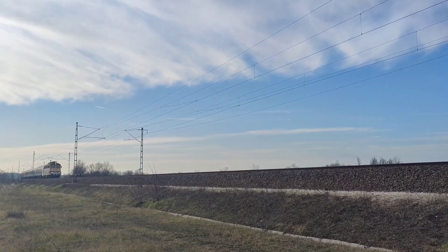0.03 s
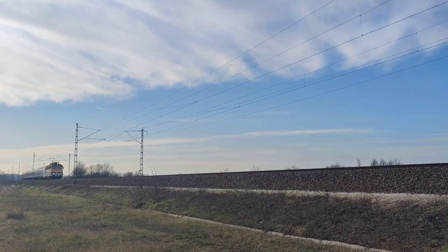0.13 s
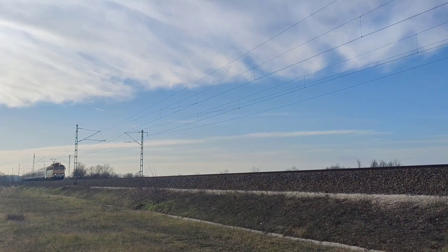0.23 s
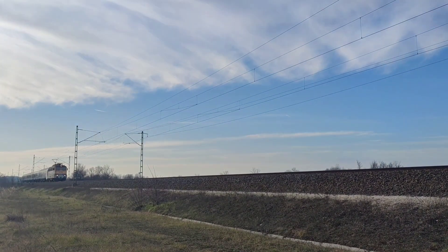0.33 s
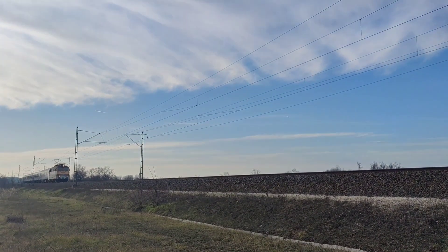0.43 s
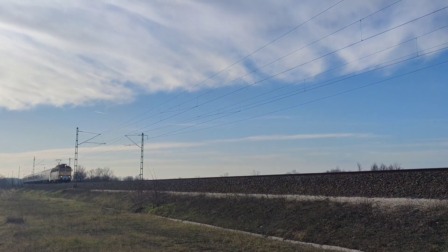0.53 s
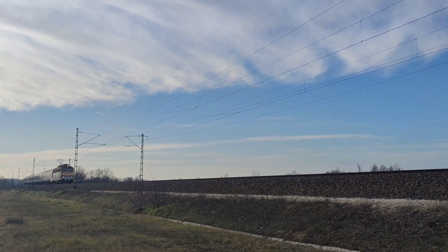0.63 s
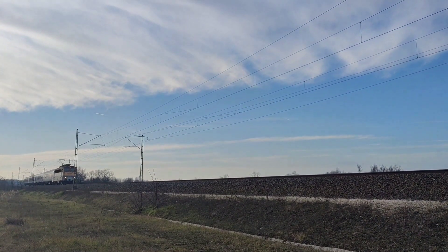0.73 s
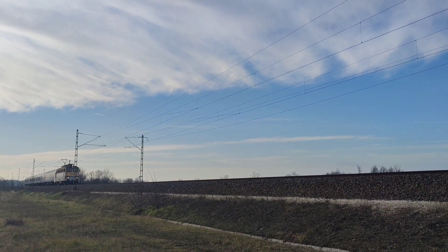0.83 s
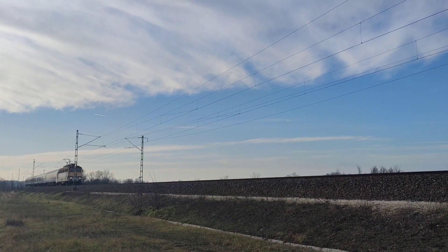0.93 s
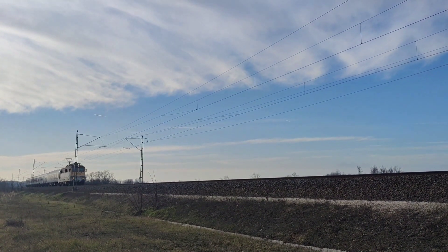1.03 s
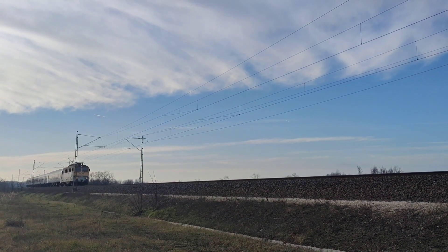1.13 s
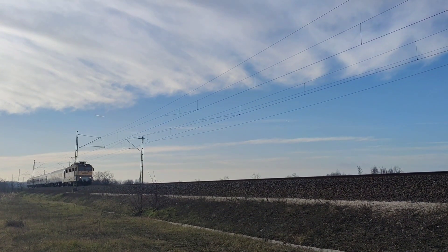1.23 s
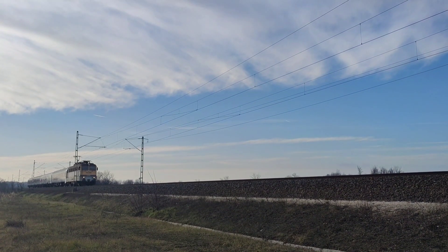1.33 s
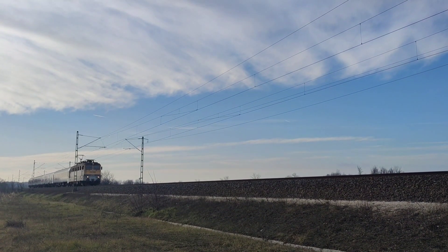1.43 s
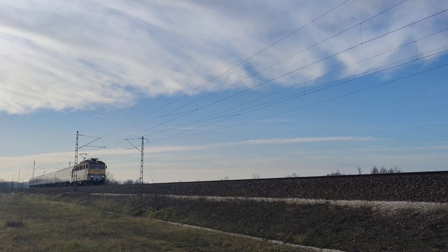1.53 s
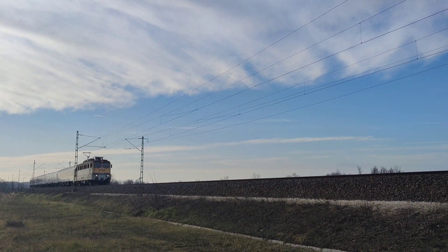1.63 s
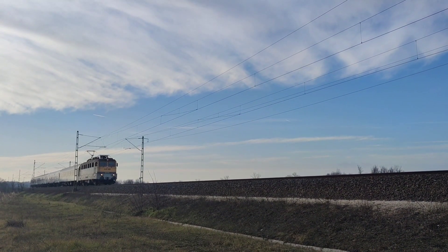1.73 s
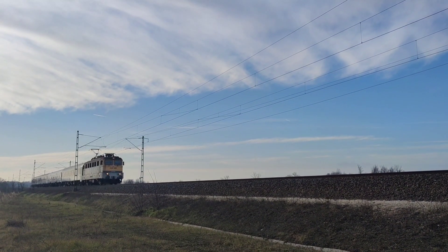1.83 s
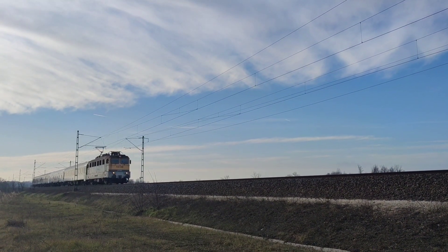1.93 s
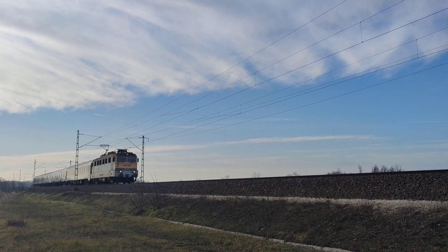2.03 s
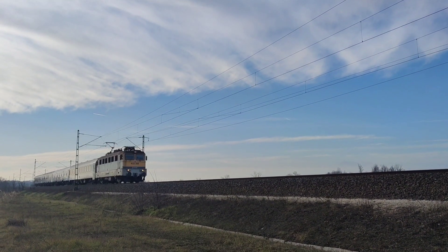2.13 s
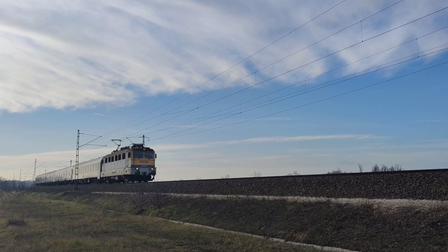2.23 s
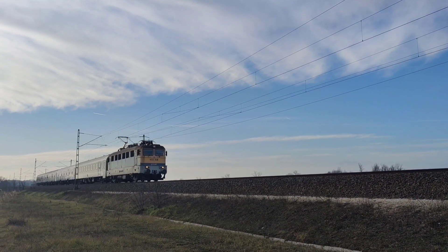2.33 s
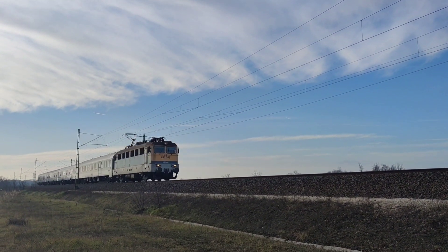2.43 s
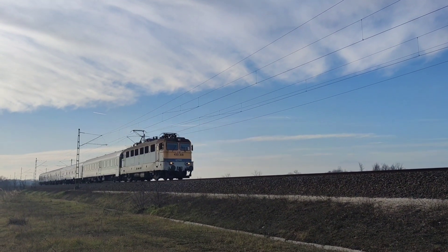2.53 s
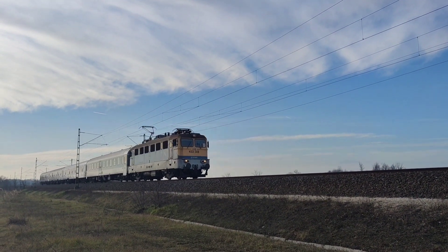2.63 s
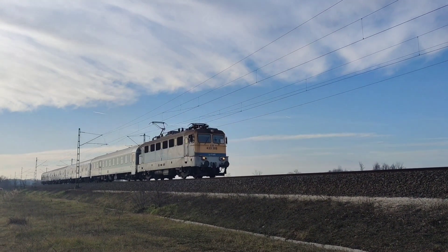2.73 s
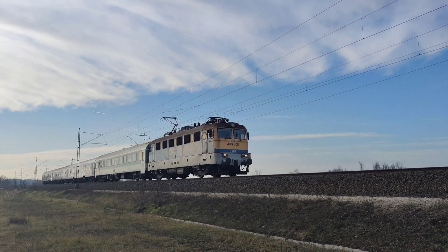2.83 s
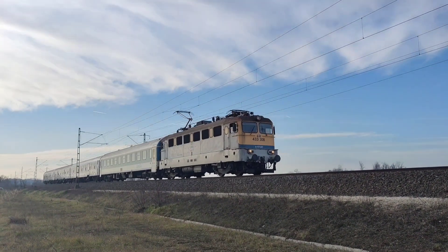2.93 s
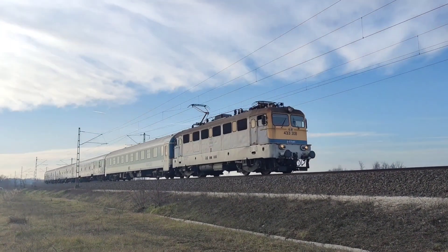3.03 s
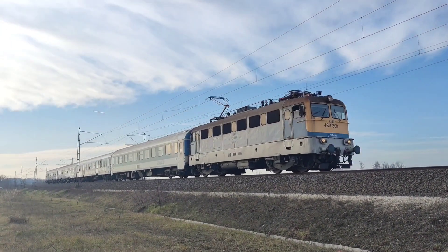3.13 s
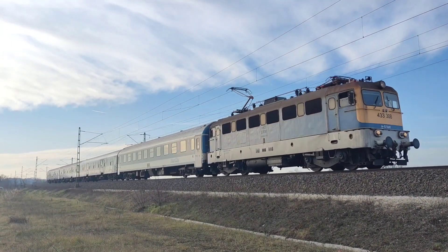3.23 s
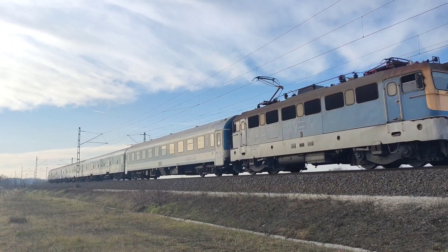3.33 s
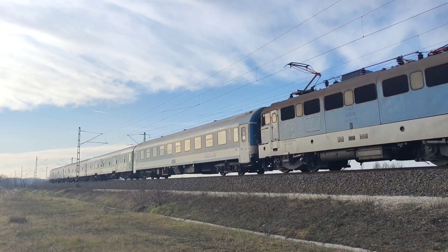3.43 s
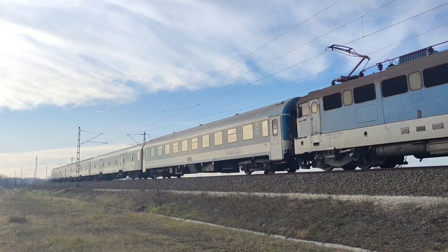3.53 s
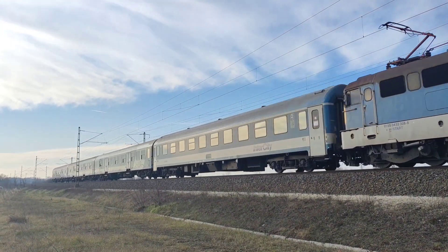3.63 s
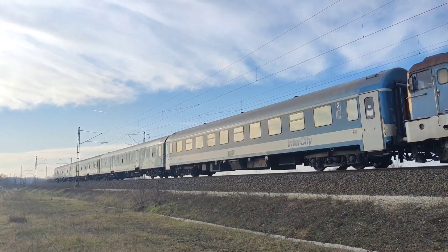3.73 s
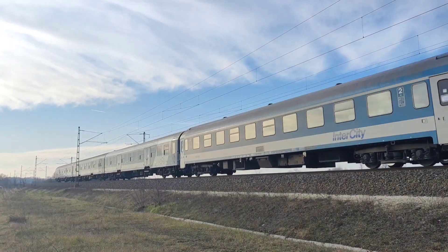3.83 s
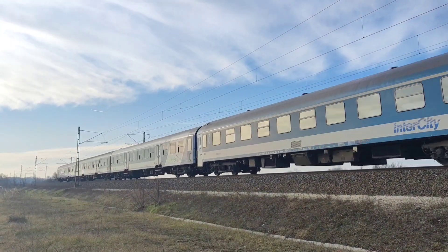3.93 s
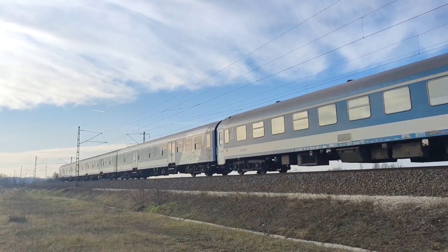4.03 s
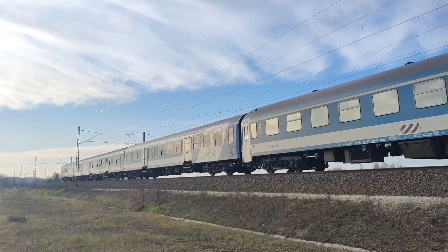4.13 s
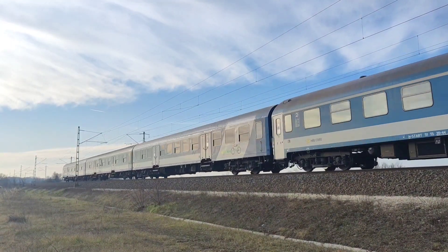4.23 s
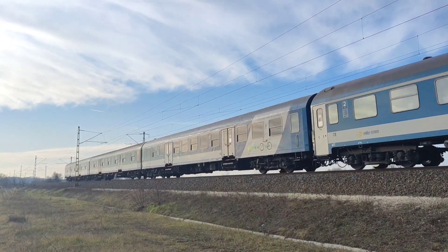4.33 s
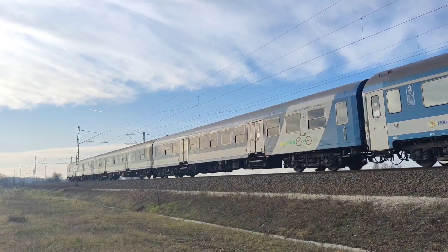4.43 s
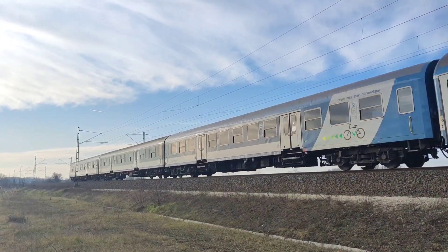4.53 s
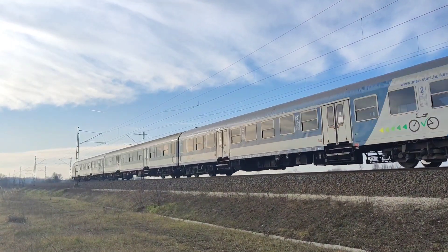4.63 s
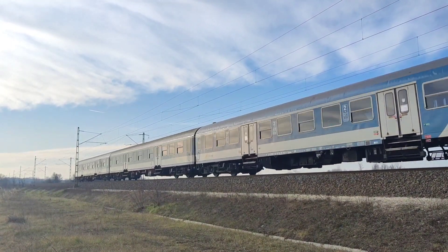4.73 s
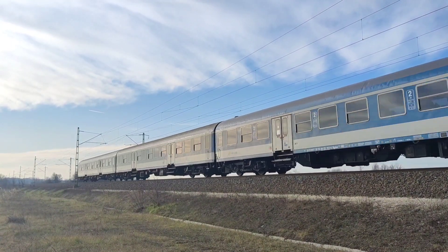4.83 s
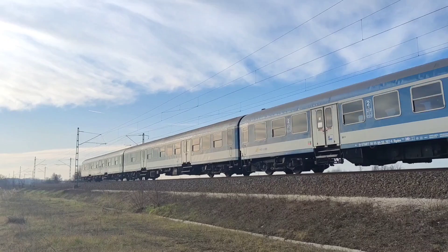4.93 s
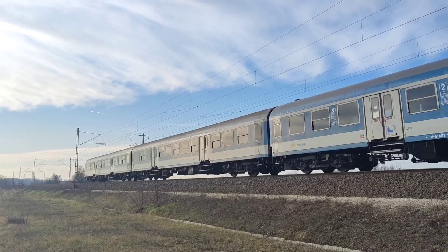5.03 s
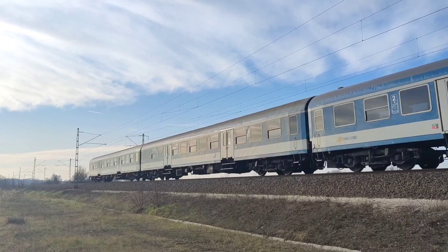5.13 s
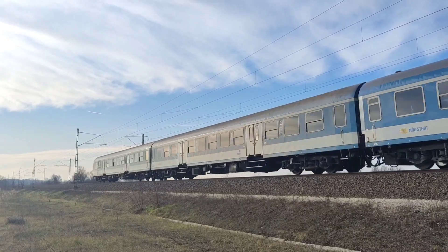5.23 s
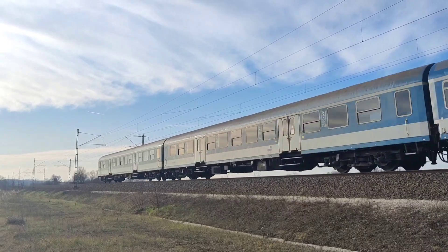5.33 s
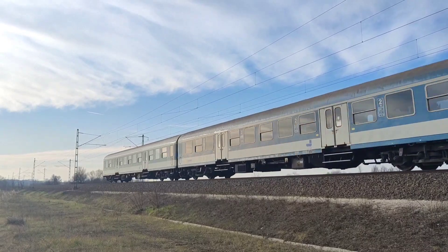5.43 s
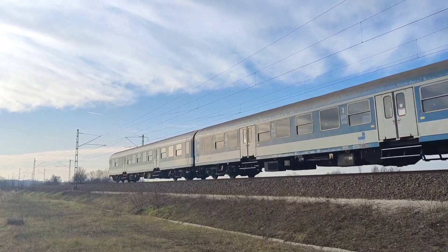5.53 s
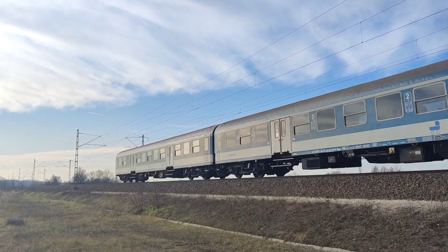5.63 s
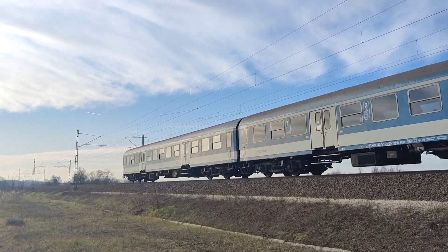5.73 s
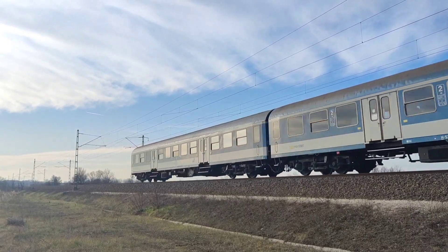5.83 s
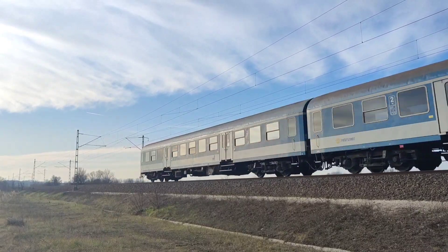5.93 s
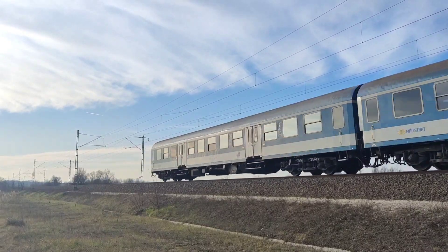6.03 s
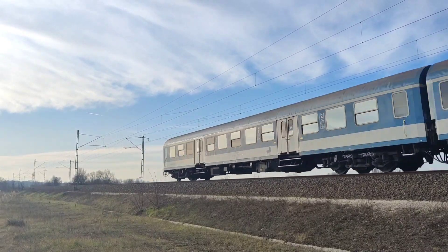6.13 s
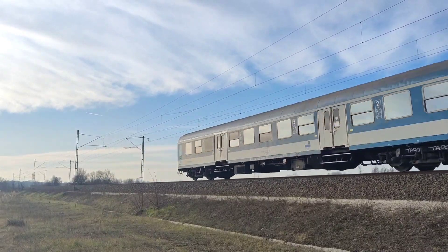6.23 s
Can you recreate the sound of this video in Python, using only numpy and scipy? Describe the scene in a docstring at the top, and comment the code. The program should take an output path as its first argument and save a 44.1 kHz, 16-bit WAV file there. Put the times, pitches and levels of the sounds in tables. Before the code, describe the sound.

An electric passenger train rumbles in from afar, rails singing, then rushes past close by with ringing wheels and brief chattering clacks.

```python
"""An electric passenger train runs in from the distance and rushes past beside an open field.
First a far rumble of rough wheels on rail and one soft knock nearby; from 1.5 s the rails sing ahead.
At 3.3-4.1 s the locomotive passes with its rumble and the note of its blowers. Coach bogies follow,
their wheel resonances sinking by Doppler shift. From 5.4 s one coach's rough treads strike the rail
and chatter."""
import sys
import numpy as np
from scipy import signal
from scipy.fft import rfft, irfft
from scipy.io import wavfile
from scipy.ndimage import uniform_filter1d

SR = 44100
rng = np.random.default_rng(int(sys.argv[2]) if len(sys.argv) > 2 else 0)


def inscribe(sig):
    """Save sig as 16-bit PCM at rate SR to the path in sys.argv[1].

    A 1-D sig is mono; a 2-D sig holds one channel per row.
    Samples are clipped to [-1, 1] before scaling.
    """
    pcm = np.round(np.clip(np.atleast_2d(sig).T, -1, 1) * 32767)
    wavfile.write(sys.argv[1], SR, pcm.astype(np.int16))


N = 276504
T = np.arange(N) / SR
FRAME = 2048
HOP = FRAME // 4
BIN_HZ = np.fft.rfftfreq(FRAME, 1 / SR)
FRAME_S = np.arange(N // HOP + 3)[:, None] * HOP / SR
TRAIN_M_PER_S, SOUND_M_PER_S, TRACK_DISTANCE_M = 32., 343., 14.

# Bogies or bogie pairs, locomotive first, with five bands of rolling noise:
# t abreast/s, body rumble/dB, sleeper roar/dB, wheel ring/dB, contact hiss/dB, fizz/dB
BOGIE_BANDS = [(3.29, -34, -29.2, -32.2, -39.6, -63.8), (3.7, -23.2, -26.9, -25.6, -30, -54.2),
               (4.12, -25.9, -28.8, -24.3, -31.1, -49.9), (4.83, -39.6, -42.4, -26.6, -33.7, -50.3),
               (5.56, -36.2, -26.3, -21.5, -27.3, -49.9), (5.87, -42.6, -34.7, -18.6, -32, -55.5),
               (6.29, -36.1, -25.4, -19.5, -26.2, -49.3)]
# Propagation, one row per band:
# distance exponent, flare/dB, level in rails/dB, rail loss/(dB/m), cut before the rails sing/dB
BAND_PATHS = [(1.38, -1.9, -33, .145, 0), (1.69, -9.6, -46.5, .085, 0), (1.77, -4.7, -40.6, .01, 8.9),
              (1.47, -5.6, -33.9, .34, 13.4), (1.73, -1.2, -75.1, .02, 3.5)]
# Stereo image of sound from abreast: f/Hz, left-right/dB, coherence, left lead/rad
NEAR_IMAGE = [(30, 0.0, 0.992, -0.05), (130, -1.0, 0.986, -0.22), (300, 0.5, 0.96, -0.48),
              (480, 2.5, 0.92, -1.3), (720, -1.0, 0.71, -1.7), (1050, 0.5, 0.57, -2.0),
              (1400, 2.0, 0.79, -3.5), (1800, 2.0, 0.47, -6.1), (2000, -1.5, 0.51, -7.4),
              (2400, -6.0, 0.58, -6.5), (2850, -2.5, 0.55, -8.5), (3200, -1.5, 0.15, -9.6),
              (4300, -4.0, 0.05, -10.5), (5600, -11.5, 0.23, -7.4), (6600, -13.5, 0.19, -8.6),
              (8200, -3.0, 0.09, -6.1), (12000, -14.0, 0.07, -8.5)]


def gain_of(db):
    """Decibels to amplitude."""
    return 10 ** (np.asarray(db) / 20)


def unit_rms(x):
    """Scaled to rms 1."""
    return x / np.sqrt(np.mean(x ** 2) + 1e-20)


def wander(rate_hz):
    """Random drift of rms 1, rolled off above rate_hz."""
    hz = np.fft.rfftfreq(N, 1 / SR)
    return unit_rms(irfft(rfft(rng.standard_normal(N)) * np.exp(-(hz / rate_hz) ** 2), N))


def step(middle_s, rise_s):
    """Soft rise from 0 to 1, per frame."""
    return .5 + .5 * np.tanh((FRAME_S - middle_s) / (2 * rise_s))


def swell(middle_s, length_s):
    """Bell curve of height 1, per frame."""
    return np.exp(-((FRAME_S - middle_s) / length_s) ** 2)


def per_bin(table):
    """Table columns interpolated over log frequency."""
    hz, *columns = np.transpose(table)
    return [np.interp(np.log(BIN_HZ + 1), np.log(hz), column) for column in columns]


def passing(t, abreast_s):
    """Doppler factor and nearness (1 when abreast) of a point on the train."""
    along_m = TRAIN_M_PER_S * (t - abreast_s)
    distance_m = np.hypot(along_m, TRACK_DISTANCE_M)
    doppler = 1 / (1 + TRAIN_M_PER_S / SOUND_M_PER_S * along_m / distance_m)
    return doppler, TRACK_DISTANCE_M / distance_m


def microphone_hiss(level_db=-77.):
    """Faint, steady white noise."""
    return gain_of(level_db) * rng.standard_normal((2, N))


def soft_knock(at_s=.1752, level_db=-30, hz=560):
    """One dull pulse nearby, without a ring."""
    cycles = (T - at_s) * hz
    return gain_of(level_db) * np.exp(-(cycles / .46) ** 2) * np.cos(2 * np.pi * cycles)


def train_tones(throb_db=3.5, throb_hz=18., waver_hz=24.7):
    """Machine notes and singing wheels swell, fade and drop in pitch as they pass."""
    # Blower (2 rows), axles over sleepers (2), gearing, singing wheels (4), coach drone:
    # t abreast/s, f at rest/Hz, t loudest/s, level/dB, swell time/s, relative pitch waver
    tones = [(3.93, 590, 4.09, -26, .24, .012), (3.93, 560, 2.7, -46, .4, .04),
             (3.65, 56, 3.7, -38, .8, .08), (3.65, 57, .7, -44.5, .9, .12), (3.65, 133, 3.3, -36, .7, .05),
             (3.7, 1865, 1.4, -51, .25, .008), (4.8, 2445, 4.9, -31, .16, .008),
             (5.72, 4580, 5.41, -32, .08, .005), (5.75, 2210, 5.92, -23, .06, .007),
             (6.35, 233, 6.12, -35, .25, .01)]
    balance_db, _, lead_rad = per_bin(NEAR_IMAGE)
    side = np.array([[.5], [-.5]])
    out = np.zeros((2, N))
    for abreast_s, hz, loudest_s, db, swell_s, waver in tones:
        doppler, _ = passing(T, abreast_s)
        cycles = np.cumsum(hz * doppler * (1 + waver * wander(waver_hz))) / SR
        phase = 2 * np.pi * cycles + side * np.interp(hz, BIN_HZ, lead_rad)
        level_db = db + throb_db * wander(throb_hz) + side * np.interp(hz, BIN_HZ, balance_db)
        out += gain_of(level_db) / np.cosh((T - loudest_s) / swell_s) * np.sin(phase)
    return out


def tread_clacks(wheel_hz=2110., spread_hz=290., rise_s=.0019, rail_db=-8., rail_hz=1280.):
    """Rough treads strike: six wheel modes and the rail ring for a few milliseconds."""
    # Strikes: t/s, level/dB
    strikes = [(5.375, -19), (5.504, -10), (5.702, -11), (5.718, -4), (5.854, -5), (5.868, -4), (5.89, -12),
               (6.084, -7), (6.256, -4)]
    out = np.zeros((2, N))
    for start_s, db in strikes:
        span = np.flatnonzero((T >= start_s) & (T < start_s + 20 * rise_s))
        t = T[span] - start_s
        modes_hz = wheel_hz + spread_hz * rng.uniform(-1, 1, (6, 1))
        wheel = np.sin(2 * np.pi * modes_hz * (t - rise_s)).mean(0)  # in step at first, then beating
        rail = gain_of(rail_db) * np.sin(2 * np.pi * rail_hz * t)
        envelope = gain_of(db) * t / rise_s * np.exp(1 - t / rise_s)
        out[:, span] += envelope * np.array([.87 * wheel + rail, wheel - rail])
    return out


def sleeper_beat(spacing_m=.55, depth_db=.3, waver=.063, waver_hz=8.):
    """Gain throb: the rail is stiffer over each sleeper."""
    cycles = np.cumsum(TRAIN_M_PER_S / spacing_m * (1 + waver * wander(waver_hz))) / SR
    return gain_of(depth_db * np.sin(2 * np.pi * cycles))


def resonance(hz, width_hz, db):
    """Power response of one mode, with steep skirts."""
    return gain_of(db) ** 2 / (1 + ((BIN_HZ - hz) / (.71 * width_hz)) ** 2) ** 2


def rail_and_wheel_modes(arrival, ripple_db=1.43, ripple_rise_hz=12000., distance_exponent=2.1):
    """Power gain: rails ring at steady pitch ahead of the train, wheel modes slide down as they pass."""
    # Rail modes: f/Hz, width/Hz, level re rolling noise/dB
    rail_modes = [(780, 50, 0), (2880, 170, 3), (4400, 250, -6), (5750, 200, -2.5), (1405, 42, 8)]
    # Wheel modes: t abreast/s, f at rest/Hz, width/Hz, level re rolling noise/dB
    wheel_modes = [(3.5, 715, 145, 6.7), (3.65, 324, 70, 0.5), (4.1, 225, 50, 1), (3.7, 1720, 160, 3.5),
                   (3.75, 2390, 220, 4), (4.1, 1700, 110, 1), (4.1, 2550, 150, -5), (4.1, 5740, 500, 1.5),
                   (4.4, 7400, 110, -5.5), (4.25, 8360, 130, 4), (4.8, 1770, 90, 3), (4.8, 2447, 99, 6.5),
                   (4.9, 6100, 150, -4), (5.6, 760, 120, 0.5), (5.65, 1230, 172, -5),
                   (5.75, 2175, 150, 5.5), (5.75, 1900, 200, 0), (5.72, 4580, 70, 7), (5.75, 6950, 180, 0),
                   (6.35, 345, 60, 0), (6.35, 2140, 200, -6), (6.35, 2630, 130, -0.5)]
    lift = 1 + (1 - arrival) * sum(resonance(*mode) for mode in rail_modes)
    for abreast_s, hz, width_hz, db in wheel_modes:
        doppler, nearness = passing(FRAME_S, abreast_s)
        lift = lift + nearness ** distance_exponent * resonance(hz * doppler, width_hz, db)
    depth_db = ripple_db * (1 + BIN_HZ / ripple_rise_hz)  # many weak modes ripple the spectrum
    for abreast_s in np.unique(np.round(np.transpose(wheel_modes)[0])):
        doppler, nearness = passing(FRAME_S, abreast_s)
        weak_modes = unit_rms(uniform_filter1d(rng.standard_normal(len(BIN_HZ)), size=4))
        lift = lift * gain_of(depth_db * nearness * np.interp(BIN_HZ / doppler, BIN_HZ, weak_modes)) ** 2
    return lift


def airborne_power(band, flare_s=.125):
    """Band power per bogie: falls with distance, flares abreast as the wheels beam sound sideways."""
    exponent, flare_db = BAND_PATHS[band][:2]
    powers = []
    for abreast_s, *bands_db in BOGIE_BANDS:
        _, nearness = passing(FRAME_S, abreast_s)
        flare = gain_of(flare_db) ** 2 * swell(abreast_s, flare_s)
        powers.append(gain_of(bands_db[band]) ** 2 * (nearness ** (2 * exponent) + flare))
    return np.array(powers)


def band_levels_db(sing_s=1.46, sing_rise_s=.067, swell_s=.045):
    """Band levels: all bogies heard through the air, plus what the rails carry ahead."""
    # Brief rumble swells: t/s, level/dB
    swells = [(.48, 5), (2.38, 2.5), (3.1, 3.5), (3.63, 2), (4.0, 2)]
    # Brief treble surges: t/s, length/s, ring and hiss/dB, fizz/dB
    surges = [(1.72, .12, 2, .8), (4.19, .05, .8, 3), (5.7, .055, 2.2, 2.2), (6.25, .05, 1.5, 2.5)]
    ahead_m = TRAIN_M_PER_S * np.maximum(BOGIE_BANDS[0][0] - FRAME_S, 0)
    before_singing = 1 - step(sing_s, sing_rise_s)
    levels_db = []
    for band, (_, _, rail_db, loss_db_per_m, cut_db) in enumerate(BAND_PATHS):
        rail_power = gain_of(rail_db - loss_db_per_m * ahead_m - cut_db * before_singing) ** 2
        levels_db.append(10 * np.log10(airborne_power(band).sum(0) + rail_power))
    rumble, roar, ring, hiss, fizz = levels_db
    swell_db = sum(db * swell(at_s, swell_s) for at_s, db in swells)
    surge_db = sum(db * swell(at_s, length_s) for at_s, length_s, db, _ in surges)
    fizz_db = sum(db * swell(at_s, length_s) for at_s, length_s, _, db in surges)
    return rumble + swell_db, roar, ring + surge_db, hiss + surge_db, fizz + fizz_db


def treble_lean_db(offset_db=1.9, swing_db=10.5, lag_s=.15, shade_hz=1200.):
    """Left-right balance: treble leans right as a hissing bogie comes, left as it goes."""
    along_m = np.array([TRAIN_M_PER_S * (FRAME_S - lag_s - bogie[0]) for bogie in BOGIE_BANDS])
    angle = np.arctan(along_m / TRACK_DISTANCE_M)
    side = np.average(np.sin(angle) * np.cos(angle), axis=0, weights=airborne_power(band=3))
    return (offset_db + swing_db * side) * BIN_HZ / (BIN_HZ + shade_hz)  # only short waves are shaded


def stereo_image(table):
    """Balance/dB and complex coherence per bin."""
    balance_db, coherence, lead_rad = per_bin(table)
    return balance_db, np.clip(coherence, 0, .999) * np.exp(1j * lead_rad)


def stereo_noise(power, arrival):
    """Left and right noise spectra and their mid power; the image widens as the train arrives."""
    # Stereo image of sound from down the line: f/Hz, left-right/dB, coherence, left lead/rad
    far_image = [(30, 0.0, 0.96, 0.08), (250, 0.0, 0.991, 0.13), (500, 0.5, 0.87, -0.17),
                 (800, -1.5, 0.55, -0.29), (1100, -2.0, 0.84, 0.27), (1230, -2.5, 0.05, 1.0),
                 (1400, 2.5, 0.93, 2.6), (1600, 6.5, 0.72, 1.0), (1900, -0.5, 0.94, 0.07),
                 (2250, -9.0, 0.23, 1.4), (2550, -5.5, 0.82, 1.2), (2900, -16.5, 0.22, 1.0),
                 (3300, -3.5, 0.81, 2.7), (3900, -9.5, 0.54, 4.7), (4600, -10.5, 0.6, 4.1),
                 (5300, -16.0, 0.22, 1.8), (5800, -13.0, 0.68, -0.25), (6500, -19.5, 0.29, 1.0),
                 (7300, -11.0, 0.26, 2.6), (8400, -0.5, 0.13, -0.34), (12000, -5.0, 0.04, 2.1)]
    far_and_near = zip(stereo_image(far_image), stereo_image(NEAR_IMAGE))
    balance_db, coherence = (far + arrival * (near - far) for far, near in far_and_near)
    balance_db = balance_db + treble_lean_db()
    draws = rng.standard_normal((4,) + power.shape)
    left, independent = draws[::2] + 1j * draws[1::2]
    right = coherence.conj() * left + np.sqrt(1 - abs(coherence) ** 2) * independent
    pan = np.array([gain_of(balance_db / 2), gain_of(-balance_db / 2)])
    pan /= np.sqrt((pan ** 2).mean(0))
    mid_power = power * (1 + pan.prod(0) * coherence.real) / 2
    return np.array([left, right]) * pan * np.sqrt(power), mid_power


def rolling_noise(arrival_s=3.7, arrival_exponent=2.6, coaches_s=4.75, blend_s=.22,
                  flutter_db=(.8, .6, .8, .4, .3), flutter_hz=(14, 40, 70, 60, 60)):
    """Wheel and rail roughness shakes bodies, sleepers, rails and wheels."""
    # Spectral shapes far off, beside the locomotive and beside the coaches: f/Hz, level/dB
    far = [(10, -18), (35, 0), (64, 0.5), (90, -2.5), (180, -2), (330, -11), (540, -19), (780, -8),
           (1250, -11), (1530, -18.5), (1900, -12), (2300, -18), (2850, -11.5), (3300, -14), (5800, -17.5),
           (6300, -23.5), (7200, -31.5), (8400, -43.5), (11000, -40.5), (15500, -52)]
    locomotive = [(10, -33), (30, -6), (60, 0), (130, -4), (300, -5.5), (470, -10), (700, -7), (1100, -13),
                  (1800, -9), (2500, -8), (3200, -12), (5800, -12), (7000, -20), (8100, -34.5),
                  (10500, -33.5), (15500, -48)]
    coaches = [(10, -32), (35, -6), (110, -10), (170, -14), (300, -12), (480, -17), (780, -6.5),
               (1020, -6.5), (1300, -1), (1650, -10.5), (2100, -6.5), (2700, -7.5), (3200, -13.5),
               (5700, -10.5), (7000, -20), (8100, -31.5), (10500, -34), (15500, -45)]
    # Edges between the five bands: f/Hz
    crossovers_hz = [400, 1500, 3200, 8600]
    arrival = passing(np.minimum(FRAME_S, arrival_s), arrival_s)[1] ** arrival_exponent
    far_db, locomotive_db, coaches_db = (per_bin(table)[0] for table in (far, locomotive, coaches))
    colour_db = far_db + arrival * (locomotive_db - far_db)
    colour_db += step(coaches_s, blend_s) * (coaches_db - locomotive_db)
    noise, mid_power = stereo_noise(gain_of(colour_db) ** 2 * rail_and_wheel_modes(arrival), arrival)
    lowpasses = [0] + [1 / (1 + (BIN_HZ / hz) ** 10) for hz in crossovers_hz] + [1]
    out = np.zeros((2, N))
    for band, level_db in enumerate(band_levels_db()):
        bandpass = lowpasses[band + 1] - lowpasses[band]
        gain = gain_of(level_db) / np.sqrt((mid_power * bandpass ** 2).sum(1, keepdims=True))
        spectra = (noise * bandpass * gain).transpose(0, 2, 1)
        _, sound = signal.istft(spectra, nperseg=FRAME, noverlap=FRAME - HOP)
        out += sound[:, :N] * gain_of(flutter_db[band] * wander(flutter_hz[band]))  # uneven treads
    return out


def scene():
    """The passing train, left and right."""
    return rolling_noise() * sleeper_beat() + train_tones() + tread_clacks() + soft_knock() + microphone_hiss()


def record(dry):
    """Soft peak limit, then low-pass."""
    ceiling, cutoff_hz = .95, 15700
    rounded = dry / (1 + (dry / ceiling) ** 8) ** (1 / 8)
    lowpass = signal.firwin(511, cutoff_hz, window=("kaiser", 9), fs=SR)
    return signal.oaconvolve(rounded, lowpass[None], "same")


dry = scene()
out = record(dry)
inscribe(out)
```